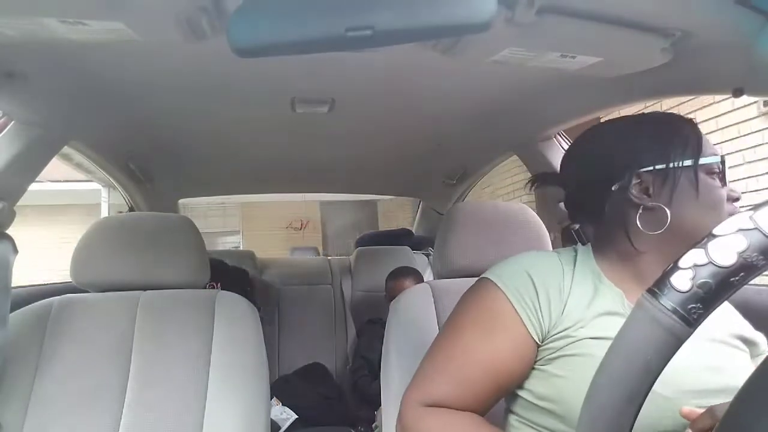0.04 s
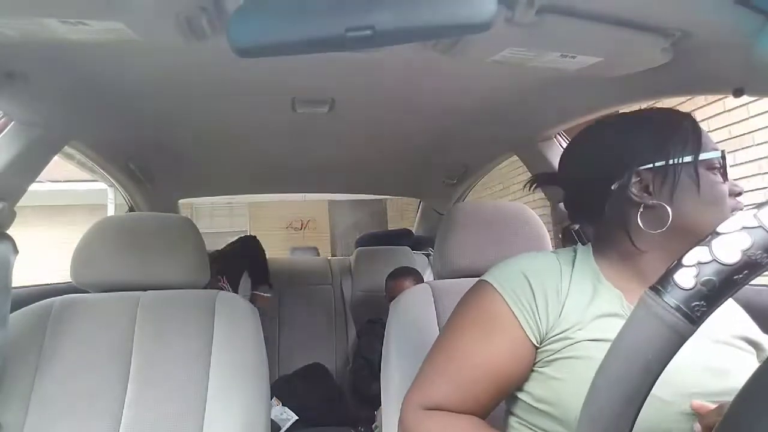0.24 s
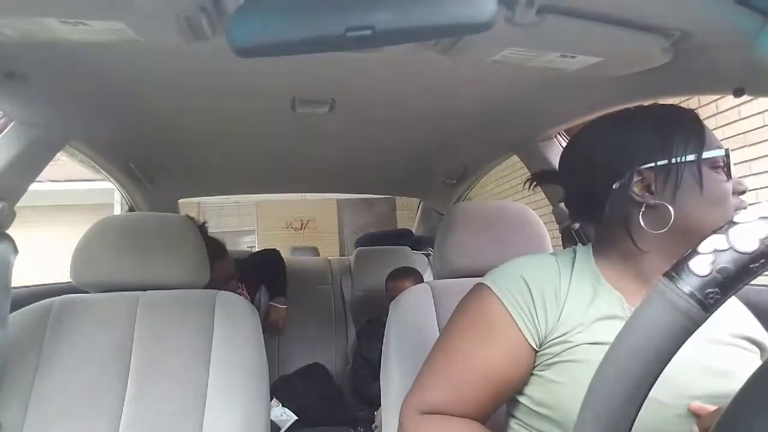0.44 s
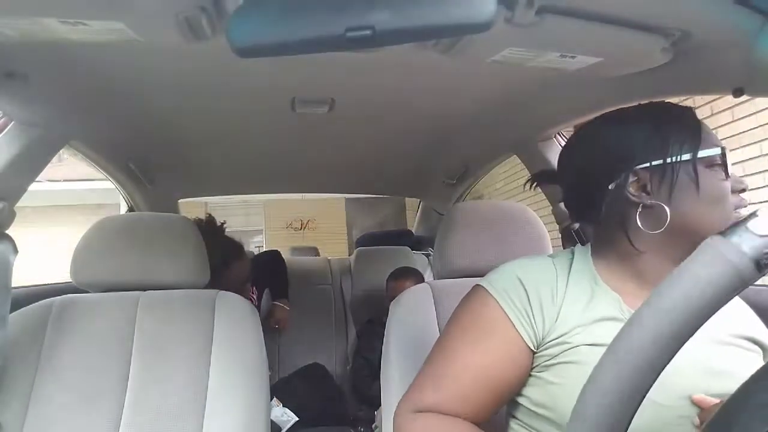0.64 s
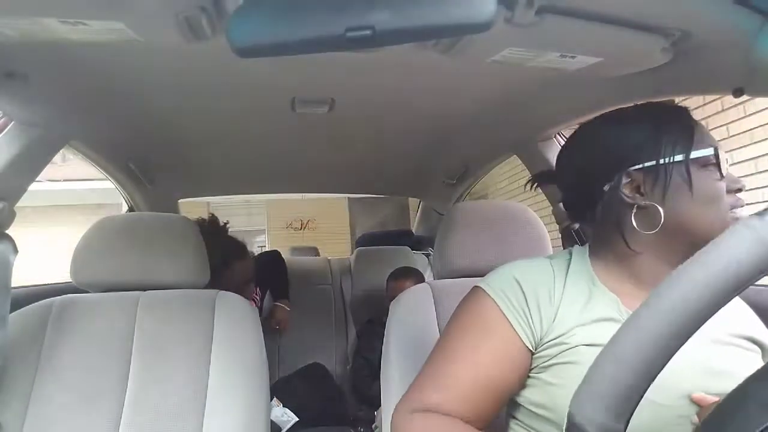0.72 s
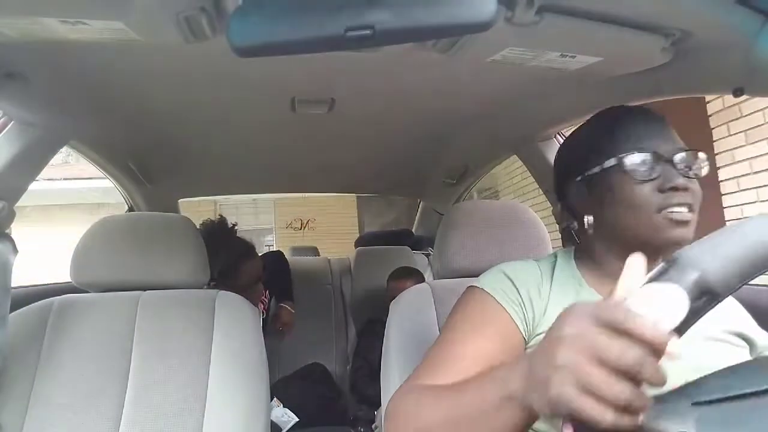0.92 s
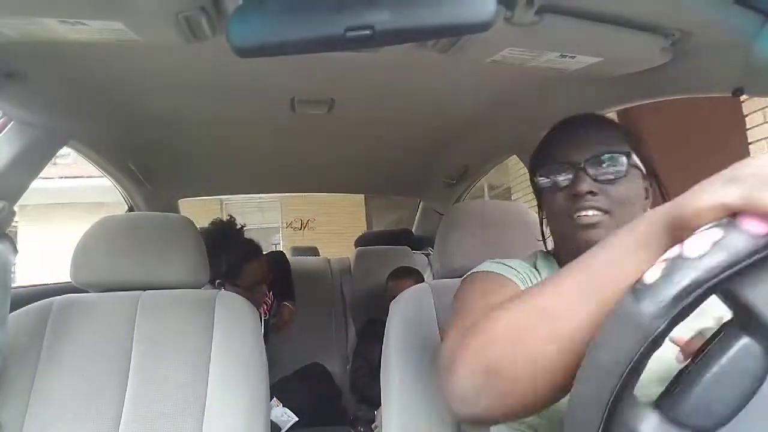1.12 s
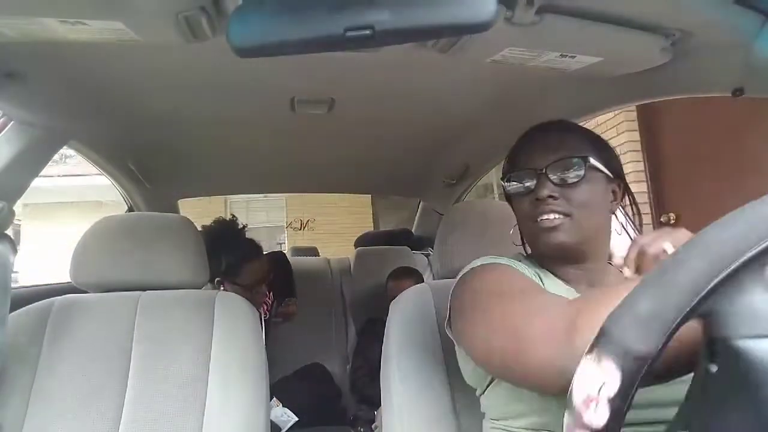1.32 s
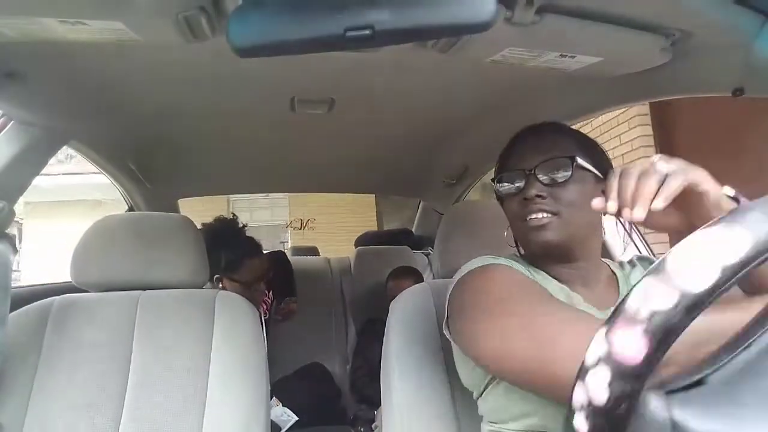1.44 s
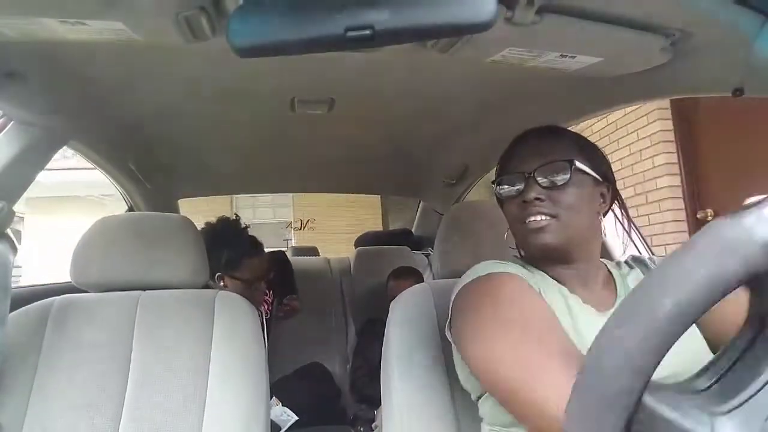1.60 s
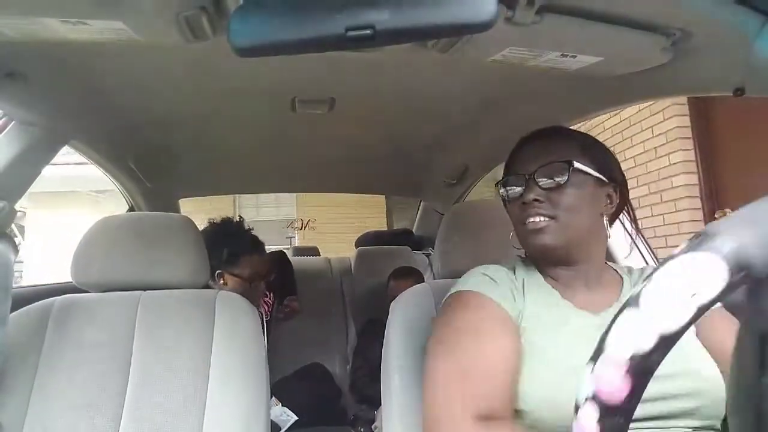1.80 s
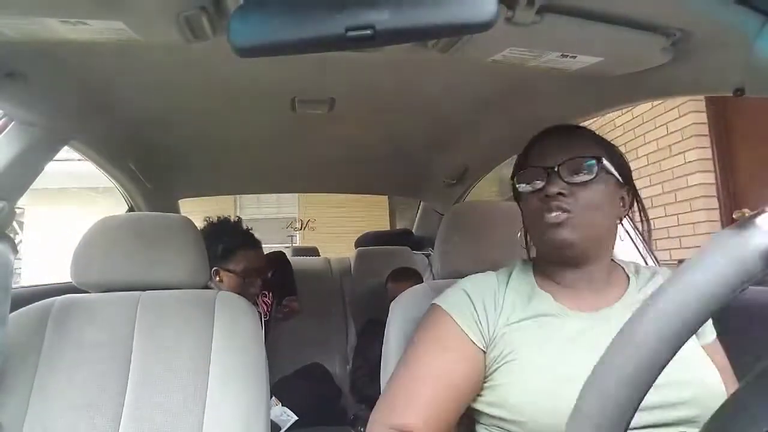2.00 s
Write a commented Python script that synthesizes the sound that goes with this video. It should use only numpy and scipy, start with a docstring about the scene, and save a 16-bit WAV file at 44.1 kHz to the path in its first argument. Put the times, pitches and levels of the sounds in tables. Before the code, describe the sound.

A car engine idles with a low steady hum inside a cabin while hands turn the wheel

```python
"""Idling car, hands on the wheel

A four-cylinder engine idles, heard from inside a closed car, while the steering wheel is turned.
Sine tones at multiples of the firing rate hum over a rumble and hiss of shaped noise. Hands scuff, tick
and slide on the rim: grainy noise and short rings. Late on, noise pushes and low tones make dull shudders
and a groan, and a last slip ends in a rasp, quick plastic clacks and a small knock of two dying tones."""
import sys
import numpy as np
from scipy import signal
from scipy.fft import rfft, irfft
from scipy.io import wavfile
from scipy.ndimage import uniform_filter1d

SR = 44100
rng = np.random.default_rng(int(sys.argv[2]) if len(sys.argv) > 2 else 0)


def master(y):
    """Save y as 16-bit WAV."""
    cut = np.clip(np.atleast_2d(y).T, -1, 1)
    pcm = np.round(cut * 32767)  # scale
    wavfile.write(sys.argv[1], SR, pcm.astype(np.int16))


N = 90801
T = np.arange(N) / SR  # time in seconds
FREQS = np.fft.rfftfreq(N, 1 / SR)  # in Hz

# How fast the engine fires. Each row: time in seconds, firings per second.
FIRING_RATE = [(0, 27.4), (.3, 26.2), (.55, 26.6), (.8, 26.5), (1.05, 26.7), (1.35, 27.5), (1.53, 26.7),
               (1.7, 26.5), (1.85, 28.8), (2.06, 28.5)]
BODY_LEFT_DB = 1.6  # boom and groan: raised this much on the left, lowered as much on the right


def amp(db):
    """Turns decibels into gain."""
    return 10 ** (np.asarray(db) / 20)


def unit(x):
    """Scales a signal to an rms (average strength) of 1."""
    return x / np.sqrt(np.mean(x ** 2) + 1e-20)


def left_right(db):
    """Raises the left side by some decibels and lowers the right by as many."""
    return amp([[db], [-db]])


def curve(points):
    """Joins (seconds, value) points with straight lines over time."""
    return np.interp(T, *np.transpose(points))


def shape(points):
    """Joins (Hz, value) points with straight lines over log frequency."""
    hz, value = np.transpose(points)
    return np.interp(np.log(FREQS + 1), np.log(hz), value)


def drift(hz):
    """Makes a slow random wander of rms 1 that fades out above the given rate."""
    spectrum = rfft(rng.standard_normal(N)) / (1 + (FREQS / hz) ** 4)
    return unit(irfft(spectrum, N))


def tone(turns):
    """A sine wave of rms 1 that follows a count of full turns."""
    return np.sqrt(2) * np.sin(2 * np.pi * turns)


def noise(spectrum, tilt_db=0, trim=0):
    """Coloured noise at two microphones, with a share of the resonances of the wheel and trim."""
    # How alike the microphones hear. Each row: frequency in Hz, likeness (1 same, 0 unrelated, below 0 opposed).
    likeness = [(40, .97), (130, .9), (350, .72), (700, .2), (1300, -.35), (2800, .22), (6000, .1),
                (12000, .05)]
    # Their balance. Each row: frequency in Hz, left over right in dB.
    balance = [(30, -8.5), (170, 2.5), (350, 5.5), (700, 2), (2800, 1), (6000, -0.5), (10000, 2),
               (13000, 7.5)]
    # Resonances of the wheel and trim. Each row: frequency in Hz, width in Hz, full lift (or cut) in dB.
    resonances = [(2230, 52, 4), (2590, 120, 0.5), (3070, 46, -6), (4000, 200, 13), (4350, 180, -19.5),
                  (6800, 280, -3)]
    a, b = rfft(rng.standard_normal((2, N)))
    same = np.clip(shape(likeness), -1, 1)
    lean = amp(shape(balance) / 2)
    left = a * lean
    right = (same * a + np.sqrt(1 - same ** 2) * b) / lean
    peaks = sum(db / (1 + (2 * (FREQS - hz) / width) ** 2) for hz, width, db in resonances)
    tilt = tilt_db * np.log2(1 + FREQS / 1000)  # steepens towards tilt_db per octave in the treble
    colour = amp(shape(spectrum) + trim * peaks + tilt)
    return unit(irfft(np.array([left, right]) * colour, N))


def flicker(x, patchy_db):
    """Small patches of the spectrum swell and fade at random, alike on both sides."""
    z = signal.stft(x, nperseg=1024, noverlap=768)[2]
    patches = rng.standard_normal(z.shape[1:])
    patches = uniform_filter1d(patches, size=8, axis=0)  # smooth over frequency
    patches = unit(uniform_filter1d(patches, size=9, axis=1))  # smooth over time
    return signal.istft(z * amp(patchy_db * patches), nperseg=1024, noverlap=768)[1][:, :N]


def burst(start, length, rise, fall):
    """A level that climbs, holds, then dies away; all four values in seconds."""
    attack = np.clip((T - start) / rise, 0, 1)
    return attack * np.exp(-np.maximum(T - start - length, 0) / fall)


def firing_turns():
    """Counts the firings so far, by adding up the firing rate."""
    return np.cumsum(curve(FIRING_RATE)) / SR


def engine():
    """Tones at multiples of the firing rate swell with load, waver, and differ in phase from side to side."""
    # Engine load, of which each tone takes a share. Each row: time in seconds, load in dB.
    load_points = [(0, 1.5), (.55, 0), (.9, 1.5), (1.2, 3), (1.45, 6), (1.7, 8), (1.97, 3.5), (2.04, 2.5)]
    # The drone: some upper tones come forward midway. Each row: time in seconds, level in dB before the share.
    drone_points = [(0, -5.5), (.42, -14.5), (.55, -0.5), (.9, 0.5), (1.1, -1), (1.3, -6.5), (1.6, -3),
                    (2.06, -7)]
    # The tones. Each row: multiple of the firing rate, base level in dB, share of the load, share of the drone.
    # A negative share makes a tone do the opposite.
    orders = [(1, -31.5, -.6, 0), (1.5, -35, 0.33, 0.38), (2, -34.5, 0.83, 0.01), (2.5, -43, 0, 0),
              (3, -45.5, 0, 0), (4, -40.5, -.1, -.15), (5, -48, 0.7, 0), (7, -38.5, 0, 1),
              (8.7, -46.5, 0.02, 0.64), (11, -57, 0, 0.33), (12, -56.5, 0, 0), (15.7, -51.5, -.5, 0.63),
              (17.5, -59.5, 0.7, 0.17)]
    waver_db, waver_turns, mic_turns = 0.5, 0.0078, 0.037  # turns grow with the root of the multiple
    turns, load, drone = firing_turns(), curve(load_points), curve(drone_points)
    hum = 0
    for order, db, load_share, drone_share in orders:
        wander = waver_turns * drift(hz=4.3) + mic_turns * np.array([[1], [-1]]) / 2
        phase = order * turns + rng.random() + np.sqrt(order) * wander
        level = db + load_share * load + drone_share * drone + waver_db * drift(hz=5.1)
        hum = hum + amp(level) * tone(phase)
    return hum * left_right(0.95)


def cabin():
    """Rumbling noise throbs once per firing, under a thin hiss with a flickering spectrum."""
    # Colour of the rumble. Each row: frequency in Hz, dB per Hz.
    rumble_colour = [(14, -44), (24, -58), (36, -18), (62, -12), (90, -9.5), (125, -7.5), (175, -4),
                     (235, -7.5), (300, -16.5), (370, -28), (440, -30.5), (560, -23), (750, -35.5),
                     (1200, -37), (2500, -55)]
    # Level of the rumble before the throb. Each row: time in seconds, level in dB.
    rumble_level = [(0, -46), (.12, -41), (.25, -35), (.4, -39.5), (.65, -38), (1.0, -38.5), (1.2, -34.5),
                    (1.45, -36), (1.56, -38.5), (1.8, -37), (2.06, -33.5)]
    # Colour of the rumble's midrange. Each row: frequency in Hz, dB per Hz.
    mids_colour = [(150, -58), (240, -4.5), (310, -1.5), (370, -5.5), (425, 1), (520, -11.5), (700, -15.5),
                   (1000, -18.5), (1600, -51.5)]
    # Level of the midrange before the throb. Each row: time in seconds, level in dB.
    mids_level = [(0, -45.5), (.12, -44.5), (.24, -44.5), (.32, -51.5), (.48, -46.5), (.65, -42),
                  (.75, -47), (.9, -40.5), (.98, -45.5), (1.07, -41.5), (1.2, -53.5), (1.6, -48.5),
                  (2.06, -51.5)]
    # Colour of the airy hiss. Each row: frequency in Hz, dB per Hz.
    hiss_colour = [(200, -9), (900, 6), (1600, 2), (2400, 0), (3300, -4.5), (5000, -8.5), (8000, -15.5),
                   (9500, -10), (13000, -19)]
    # Level of the hiss before it flickers. Each row: time in seconds, level in dB.
    hiss_level = [(0, -57), (.4, -59.5), (.6, -56), (.72, -59.5), (.84, -54), (1.1, -57.5), (1.45, -56),
                  (1.85, -55), (2.06, -55)]
    throb_db = 2.5 * np.sin(2 * np.pi * firing_turns())
    rumble = noise(rumble_colour) * amp(curve(rumble_level))
    mids = noise(mids_colour) * amp(curve(mids_level))
    hiss = flicker(noise(hiss_colour, trim=0.14), patchy_db=3.5)
    hiss = hiss * amp(curve(hiss_level) + 0.14 * drift(hz=40.2))
    return (rumble + mids) * amp(throb_db) + hiss


def scuffs():
    """Hands brush the rim: short bursts of noise with a fine random grain."""
    # Each row: start in seconds, length in seconds, level in dB before the grain, tilt in dB per octave.
    brushes = [(0.242, 0.0049, -47.5, -16), (0.331, 0.0064, -47, -12), (0.837, 0.036, -57, 4.5),
               (0.875, 0.013, -48, -9), (0.892, 0.011, -50, 0), (0.976, 0.026, -50.5, 2.5),
               (1.18, 0.056, -58, 9), (1.27, 0.0084, -54.5, -3), (1.332, 0.015, -53, 14)]
    # Colour of the scuffs before the tilt. Each row: frequency in Hz, dB per Hz.
    scuff_colour = [(300, -22), (900, 1), (1800, -0.5), (2350, 1.5), (3000, -2), (3700, -8), (4700, -8),
                    (6500, -12.5), (10000, -13.5), (13000, -29)]
    rise_s, fall_s, grain_db = 0.0019, 0.012, 1.5
    rubbing = 0
    for start, length, db, tilt in brushes:
        rubbing = rubbing + amp(db) * burst(start, length, rise_s, fall_s) * noise(scuff_colour, tilt, trim=0.84)
    return rubbing * unit(amp(grain_db * drift(hz=300)))


def click(start, modes, rise):
    """A sharp contact sets off dying tones; each reaches the two microphones with its own phase."""
    t = np.maximum(T - start, 0)
    ringing = 0
    for hz, db, t60 in modes:
        phase = rng.random() + rng.random((2, 1)) / 2
        ringing = ringing + amp(db - 60 * t / t60) * np.sin(2 * np.pi * (hz * t + phase))
    return np.minimum(t / rise, 1) * ringing


def strikes(hits, modes):
    """Each hit is a brief bright snap of noise, with the ring of what was struck."""
    # Colour of the snap. Each row: frequency in Hz, dB per Hz.
    snap_colour = [(400, -9), (1500, -9), (2400, -2), (3200, 6), (5200, -3), (7500, -1), (13000, -2.5)]
    hold_s, fall_s, rise_s = 0.0013, 0.0011, 0.00047
    rings = sum(amp(db) * click(start, modes, rise_s) for start, db, snap_db in hits)
    snaps = sum(amp(snap_db) * burst(start, hold_s, rise_s, fall_s) for start, db, snap_db in hits)
    return rings + noise(snap_colour) * snaps


def ticks():
    """Fingers tick on the rim, which rings briefly."""
    # Each row: start in seconds, level in dB.
    taps = [(0.8812, -51.5), (0.8947, -43), (0.9046, -43), (0.9789, -45.5), (.986, -37.5)]
    # What the rim rings with. Each row: frequency in Hz, level in dB within a tick, seconds to fall by 60 dB.
    rim = [(2320, -2.5, 0.059), (2553, -11, .035), (2720, -8.5, 0.04), (3210, -13, .035), (4430, -10, 0.03),
           (4720, -7, 0.033), (4950, -11.5, .022)]
    return strikes([(start, db, db - 7) for start, db in taps], rim)  # the snap is 7 dB lower


def slide():
    """A palm slides along the rim: noise whose level and spectrum flicker."""
    # Level before the flicker. Each row: time in seconds, level in dB.
    slide_level = [(1.6, -68), (1.67, -56.5), (1.73, -48), (1.78, -46.5), (1.83, -55), (1.9, -67),
                   (1.97, -92)]
    # Colour of the slide. Each row: frequency in Hz, dB per Hz.
    slide_colour = [(500, 11), (1400, -3.5), (2400, 3), (3600, -6), (5200, -7.5), (7000, 3), (8500, -4),
                    (10000, 1.5), (13000, -14)]
    friction = flicker(noise(slide_colour, trim=0.12), patchy_db=3.4)
    return friction * amp(curve(slide_level) + 1.4 * drift(hz=150))


def shudders():
    """Dull rough pushes of noise shake the body and set the cabin booming at its own pitches."""
    # Each row: start in seconds, length in seconds, level of the push in dB, level of the boom in dB.
    shakes = [(1.636, 0.026, -31.5, -29.5), (1.709, 0.033, -29, -24), (1.841, 0.03, -28, -25),
              (1.904, 0.058, -34, -42), (1.993, 0.043, -36, -50)]
    # Colour of the push. Each row: frequency in Hz, dB per Hz.
    push_colour = [(40, -13), (110, -7), (175, -1), (220, -8.5), (270, -6), (330, -12.5), (470, -15),
                   (600, -19.5), (800, -29), (1500, -56), (4000, -53)]
    # Pitches at which the cabin booms. Each row: frequency in Hz, level in dB within the boom.
    cabin_modes = [(175, 1), (264, -5.5), (352, -12), (468, -17), (570, -22.5)]
    push_rise_s, push_fall_s = 0.0038, 0.02
    boom_rise_s, boom_fall_s = 0.0128, 0.019
    push, boom = 0, 0
    for start, length, db, boom_db in shakes:
        push = push + amp(db) * burst(start, length, push_rise_s, push_fall_s)
        modes = sum(amp(mode_db) * np.sin(2 * np.pi * (hz * T + rng.random())) for hz, mode_db in cabin_modes)
        boom = boom + amp(boom_db) * burst(start, length, boom_rise_s, boom_fall_s) * modes
    return push * noise(push_colour) + boom * left_right(BODY_LEFT_DB)


def groan():
    """The body drones in a few unsteady tones that sag in pitch together."""
    # The pitch as it sags. Each row: time in seconds, pitch in Hz.
    pitch = [(1.88, 181.9), (1.95, 178.4), (2.0, 171.3), (2.06, 163.8)]
    # When it sounds: start, length, rise and fall, all in seconds.
    span = (1.89, 0.16, 0.058, 0.05)
    # Its tones. Each row: multiple of the pitch, level in dB.
    partials = [(1, -31), (1.35, -41), (1.6, -38.5)]
    turns = np.cumsum(curve(pitch)) / SR
    tones = 0
    for ratio, db in partials:
        waver = 0.012 * drift(hz=24.4)  # in turns
        tones = tones + amp(db) * tone(ratio * turns + rng.random() + waver)
    return burst(*span) * tones * left_right(BODY_LEFT_DB)


def rasp():
    """The slipping grip rasps: one short burst of noise."""
    # Colour of the rasp. Each row: frequency in Hz, dB per Hz.
    rasp_colour = [(400, -26), (1000, -3), (1700, -3), (2500, -6.5), (3100, -9), (4000, -1.5), (4900, -3),
                   (6000, -4), (7500, -11), (13000, -16)]
    level_db = -41
    envelope = burst(start=1.997, length=0.033, rise=0.0046, fall=0.0041)
    return noise(rasp_colour, trim=0.86) * amp(level_db) * envelope


def clacks():
    """Hard plastic clacks as the grip slips, each a snap and a short ring."""
    # Each row: start in seconds, level of the ring in dB, level of the bright snap in dB.
    slips = [(2.0066, -33, -36), (2.0108, -33, -39.5), (2.0208, -34, -40), (2.024, -33.5, -34)]
    # What the plastic rings with. Each row: frequency in Hz, level in dB within a clack, seconds to fall by 60 dB.
    plastic = [(1564, -13, 0.02), (2970, -9, 0.027), (3160, -7, 0.037), (3850, -6.5, 0.014),
               (4260, -4, 0.013), (4920, -3.5, 0.021), (5220, -10, 0.011)]
    return strikes(slips, plastic)


def knock():
    """A soft push sets off dying tones, the same on both sides."""
    # Each row: frequency in Hz, level in dB, seconds to fall by 60 dB.
    knock_modes = [(644.6, -21, 0.039), (380, -23, 0.054)]
    start_s, rise_s = 2.009, 0.0048
    t = np.maximum(T - start_s, 0)
    ringing = sum(amp(db - 60 * t / t60) * np.sin(2 * np.pi * hz * t) for hz, db, t60 in knock_modes)
    return np.minimum(t / rise_s, 1) * ringing


def scene():
    """Adds up everything heard in the cabin."""
    hands = scuffs() + ticks() + slide() + rasp() + clacks() + knock()
    return engine() + cabin() + shudders() + groan() + hands


def record(dry):
    """The recorder's band limit: a steep filter takes away the highest treble."""
    cut_hz = 13200
    low_pass = signal.firwin(511, cut_hz, window=("kaiser", 9), fs=SR)
    return signal.oaconvolve(dry, low_pass[None], "same")


dry = scene()
out = record(dry)
master(out)
```